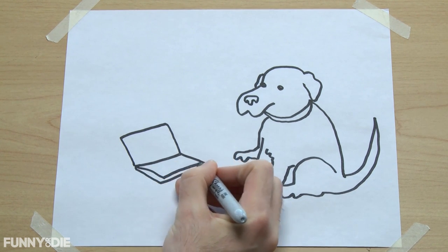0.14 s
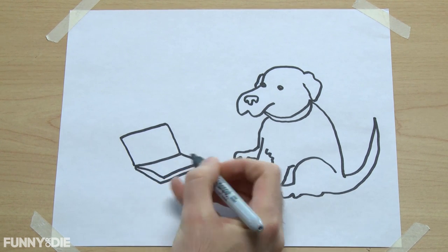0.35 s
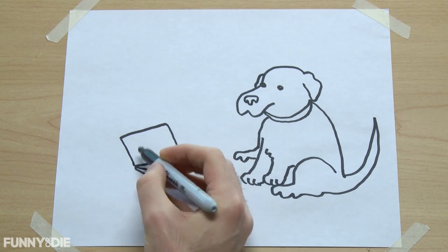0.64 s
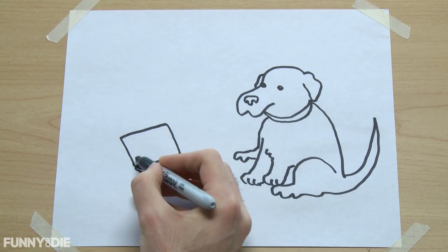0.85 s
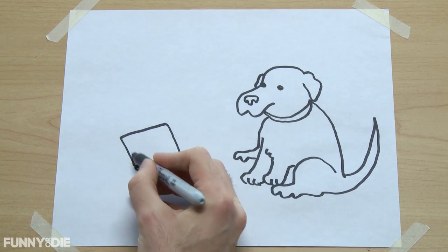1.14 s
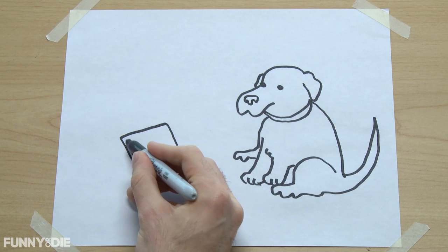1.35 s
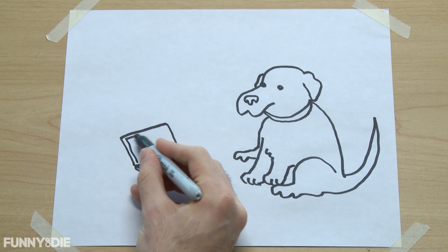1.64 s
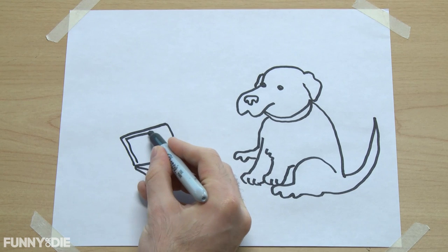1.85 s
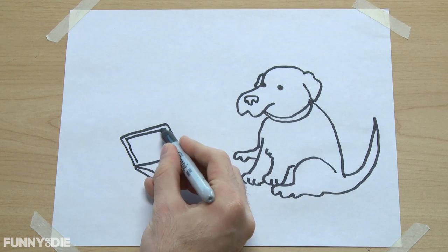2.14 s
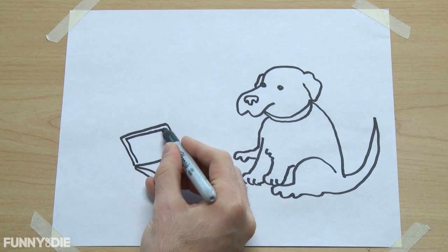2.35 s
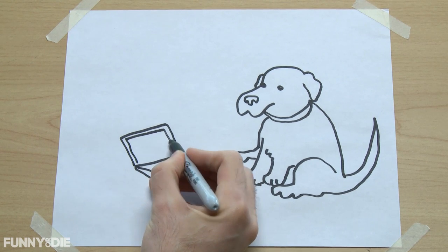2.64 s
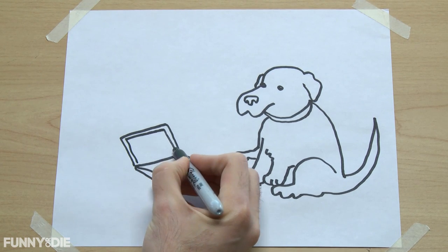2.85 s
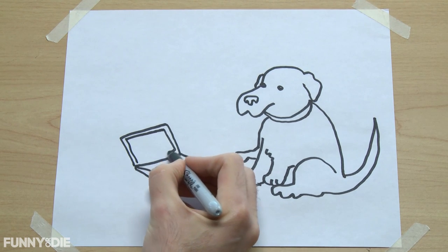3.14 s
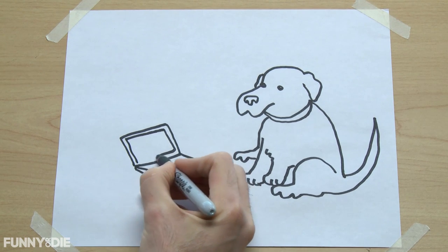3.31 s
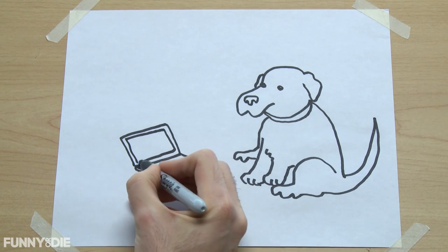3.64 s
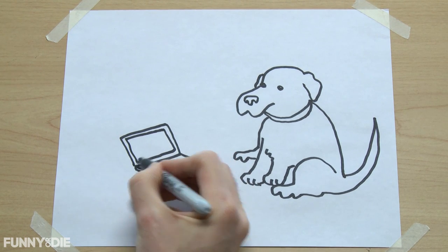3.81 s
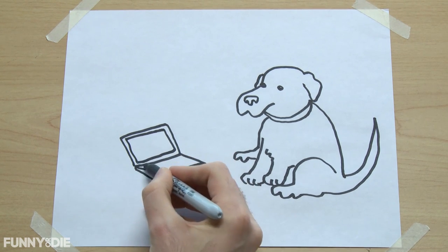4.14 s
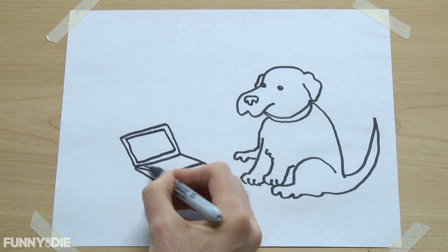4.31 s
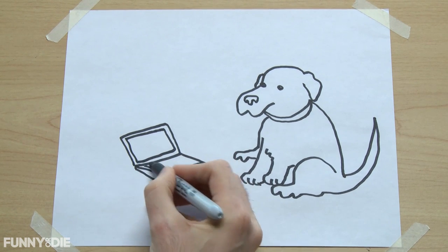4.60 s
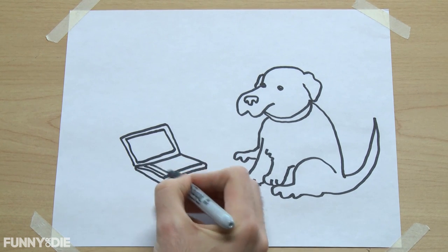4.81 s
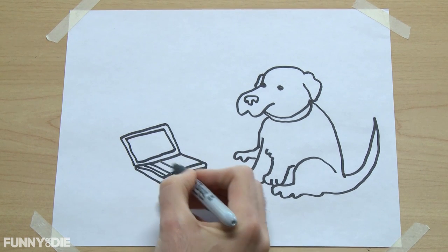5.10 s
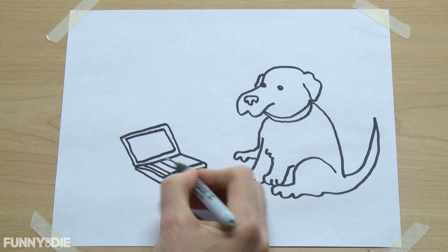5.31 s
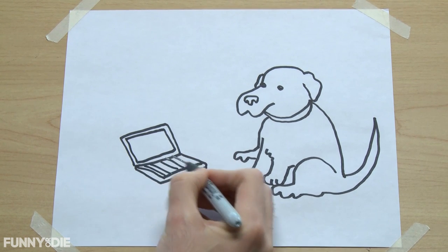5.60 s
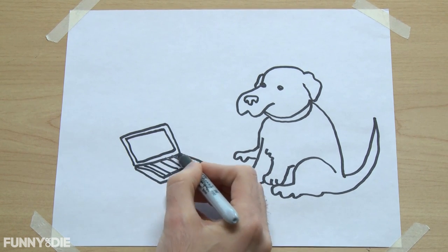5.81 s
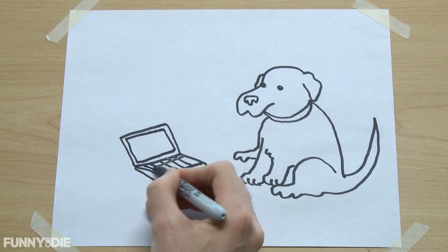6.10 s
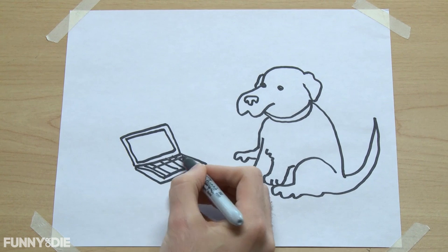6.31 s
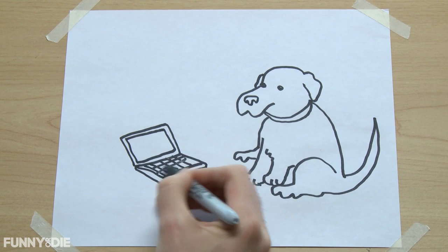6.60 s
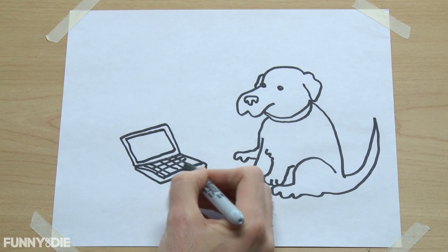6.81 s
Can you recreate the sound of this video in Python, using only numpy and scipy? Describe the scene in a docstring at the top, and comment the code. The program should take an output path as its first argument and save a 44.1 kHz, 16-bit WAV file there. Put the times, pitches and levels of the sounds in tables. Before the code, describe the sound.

Close to the microphone, a felt-tip marker makes brief scratches on paper, pauses, then draws longer raspy strokes while the hand softly rubs the sheet. Later, evenly spaced dull taps on the wooden table each lead into a short stroke, and three crisp, louder strokes finish. A small dry room has low ventilation rumble, a faint motor whine and thin hiss.

```python
"""A felt-tip marker strokes a sheet of paper taped to a wooden table, the nib catching on the fibres.
Strokes and a hand sliding over the sheet open the scene; taps of the nib follow as it lands or lifts.
The scratch is random catches ringing nib and paper modes, the slide is noise in the sheet's resonances.
Taps are blows to table modes with noise ticks; the late strokes and blows are among the strongest.
Throughout, noise and wavering tones make a ventilation rumble, a small motor's whine and a thin hiss."""
import sys
import numpy as np
from scipy import signal
from scipy.fft import rfft, irfft
from scipy.io import wavfile

SR = 44100
rng = np.random.default_rng(int(sys.argv[2]) if len(sys.argv) > 2 else 0)


def rack_gain(trim_db):
    """Turn a fader trim in dB into the linear factor to multiply a signal by."""
    fader = np.asarray(trim_db, float)
    return 10 ** (fader / 20)


def inscribe(sig):
    """Save sig as 16-bit PCM at rate SR to the path in sys.argv[1].

    A 1-D sig is mono; a 2-D sig holds one channel per row.
    Samples are clipped to [-1, 1] before scaling.
    """
    pcm = np.round(np.clip(np.atleast_2d(sig).T, -1, 1) * 32767)
    wavfile.write(sys.argv[1], SR, pcm.astype(np.int16))


N = 306495


def rms_one(x):
    """Scale to unit rms."""
    return x / np.sqrt(np.mean(x ** 2) + 1e-20)


def in_time(rows):
    """Curve through rows of (seconds, value) at every sample."""
    s, value = np.transpose(rows)
    return np.interp(np.arange(N) / SR, s, value)


def drift(rate_hz):
    """Random wander of spread 1: noise through two equal poles at rate_hz, run on every 40th sample."""
    r = np.exp(-80 * np.pi * rate_hz / SR)
    noise = rng.standard_normal(N // 40 + 4002)
    slow = signal.lfilter([1], [1, -2 * r, r * r], noise)[4000:]      # settled part
    return np.interp(np.arange(N) / 40, np.arange(len(slow)), rms_one(slow - slow.mean()))


def resonate(x, modes, waver_db=0):
    """Parallel resonances (Hz, width Hz, dB) of alternating sign, each may waver in strength; rms 1."""
    waver_hz = 5.4
    out = 0
    for k, (hz, width_hz, db) in enumerate(modes):
        r = np.exp(-np.pi * width_hz / SR)
        a = [1, -2 * r * np.cos(2 * np.pi * hz / SR), r * r]
        gain = rack_gain(db + waver_db * drift(waver_hz)) if waver_db else rack_gain(db)
        ring = (1 - r * r) / 2 * signal.lfilter([1, 0, -1], a, x)
        out = out + (-1) ** k * gain * ring
    return rms_one(out)


def band(x, low_hz, high_hz):
    """Steep band-pass; rms 1."""
    return rms_one(signal.sosfilt(signal.butter(3, [low_hz, high_hz], "band", fs=SR, output="sos"), x))


def gesture(start_s, rise_s, hold_s, early_db, late_db, arch_db, fade_db_per_s):
    """Level in dB of a movement (climb, drifting and arching hold, steady fade) and where it sounds."""
    climb_db, faintest_db = 29, -95
    t = np.arange(N) / SR - start_s
    through = np.clip((t - rise_s) / hold_s, 0, 1)
    db = early_db + (late_db - early_db) * through + arch_db * np.sin(np.pi * through)
    db = db - climb_db * np.clip(1 - t / rise_s, 0, 1)
    db = db - fade_db_per_s * np.maximum(t - rise_s - hold_s, 0)
    return db, (t >= 0) & (db > faintest_db)


def catches():
    """Fibres let go at random: impulses of either sign, up to 7.5 dB below the hardest."""
    catches_per_s = 9000
    sizes = rack_gain(-1.5 * np.minimum(rng.exponential(1, N), 5)) * rng.choice([-1, 1], N)
    return sizes * (rng.random(N) < catches_per_s / SR) + 1e-18


def stroke_powers():
    """Power of scratch, its top and the paper drag in each direction; drag swings less than scratch."""
    # Each row a stroke: start in s, rise in s, pull in s, scratch level early and late in the pull in dB
    # before the arch.
    strokes = [(0.0, 0.0012, 0.057, -54.5, -54.5), (.085, 0.027, 0.045, -52.5, -55),
               (.172, 0.038, .005, -49.5, -49.5), (.265, 0.029, .003, -56, -59),
               (1.131, 0.0089, 0.15, -47, -47), (1.27, .12, 0.077, -50.5, -60.5),
               (1.635, 0.0062, 0.16, -41.5, -58), (1.7, 0.12, 0.046, -50, -52.5),
               (1.894, 0.047, 0.025, -48.5, -49), (2.01, 0.026, 0.028, -52, -52.5),
               (2.13, 0.026, .005, -51, -54), (2.385, 0.024, .003, -56, -75), (2.49, .03, 0.12, -62.5, -53),
               (2.57, .14, .03, -54.5, -56), (2.72, 0.11, .01, -59, -61), (3.05, 0.058, 0.19, -52.5, -44.5),
               (3.2, .17, 0.034, -47.5, -50), (3.34, 0.076, .13, -52.5, -48),
               (3.5, 0.096, .006, -49.5, -52), (3.63, 0.058, 0.067, -52, -53),
               (3.925, 0.0044, 0.086, -62, -66), (4.31, 0.05, 0.082, -49, -49.5),
               (4.74, 0.023, 0.073, -47.5, -51.5), (5.03, 0.022, 0.061, -52, -48.5),
               (5.31, 0.03, 0.071, -47.5, -52), (5.588, 0.023, 0.073, -52, -49),
               (5.88, 0.029, 0.072, -68, -71), (6.062, 0.0096, 0.099, -39, -38.5),
               (6.493, 0.016, 0.071, -38.5, -38.5), (6.861, 0.034, 0.034, -36.5, -39.5)]
    # Direction index of each stroke.
    headings = [0, 0, 0, 0, 1, 1, 2, 2, 2, 2, 2, 1, 3, 3, 3, 0, 0, 0, 0, 4, 4, 5, 5, 5, 7, 7, 3, 6, 6, 6]
    # Each row a direction: fade as the nib lifts in dB/s, paper drag at a firm stroke in dB,
    # brightness of the top against the scratch in dB.
    pulls = [(328, -59.5, -0.5), (280, -53, 3.5), (454, -59, 2.5), (320, -55, 4), (260, -57.5, 4),
             (474, -54, -0.5), (426, -59, -4.5), (900, -54.5, -0.5)]
    arch_db = 1.7      # fastest, so loudest, in the middle of the pull
    drag_follows, firm_db = 0.7, -46.5      # share of the scratch's swing around a firm stroke
    fresh_top_db, fresh_drag_db, fresh_s = -3, 0.5, 0.04      # starts duller on top, with more drag
    power = np.zeros((len(pulls), 3, N))
    for stroke, k in zip(strokes, headings):
        fade_db_per_s, drag_db, bright_db = pulls[k]
        db, on = gesture(*stroke, arch_db, fade_db_per_s)
        db = db[on]
        fresh = np.exp(-np.arange(on.sum()) / (fresh_s * SR))
        top_db = db + bright_db + fresh_top_db * fresh
        sheet_db = drag_db + drag_follows * (db - firm_db) + fresh_drag_db * fresh
        power[k][:, on] += rack_gain([db, top_db, sheet_db]) ** 2
    return power


def marker():
    """The same catches ring nib and paper; the direction of pull sets how hard each mode is driven."""
    # What nib and barrel ring with. Each row: frequency in Hz, width in Hz.
    nib_modes = [(7700, 310), (8300, 370), (8800, 410), (9200, 410), (9800, 240), (10300, 280),
                 (10800, 360), (11400, 390), (12100, 770), (12700, 670), (13300, 570), (14000, 850),
                 (14700, 730)]
    # Resonances of the sheet under the nib. Each row: frequency in Hz, width in Hz.
    paper_modes = [(1500, 195), (2200, 810), (3000, 1340), (3700, 740), (4300, 860), (5000, 530),
                   (5700, 540), (6500, 660), (7000, 720)]
    # Each row a direction: relative drive of each nib mode in dB.
    nib_drive = [(-4, -5.5, -7.5, -8.5, -6.5, -1.5, -7, -8, -10, -13.5, -24, -13, -25),
                 (-6, 0.5, -2, -6, -3, -3.5, -8, -11, -12, -14, -12, -14, -6),
                 (-8, -3, -3, -3, -6, -6, -7, -4, -7, -13, -9, -15, -10),
                 (-6, -2, -4, -5, 0, -4, -6, -6, -10, -10, -7, -12, -11),
                 (-1, 0, -1, -2, -1, 1, 3, -2, 3, -2, -7, -2, -11),
                 (-5.5, -3.5, -7, -5, -1, -6, -8, -8, -6, -4, -2, -4, -8),
                 (-9, -6.5, -7, -7, -6.5, -2.5, -6, -9, -11, -7, -11, -13, -15),
                 (-3, -1.5, -4, -2, 2, 3, -3, -10, -8, -3, -3, 0, -2)]
    # Each row a direction: relative drive of each paper mode in dB.
    paper_drive = [(-3, -10.5, -5, -2.5, -4.5, 0.5, -0.36, 0.5, -3), (5.5, -4, -4.5, 1, 0.5, 2, 1, 5, 2),
                   (-7, -8, -5, 1, -2, 0.5, 0, 2.5, 1), (-2, -17, -11.5, -2.5, -2, 2.8, -1.2, -3, -2),
                   (-17, -9, -7, -4, -4, 0.5, 0.32, -0.5, -1), (-2, -8.5, -9, -4, -3.5, 1, -1, 2, -1),
                   (0.5, -10, -9.5, -4.5, -4.5, 0.5, -0.84, 2, 2),
                   (2, -8, -6.5, -3, -4, 1.5, -0.85, 1.5, 0)]
    waver_db = 1      # each mode's drive wanders as the nib rolls
    rasp_db = -8      # fibres that rasp without ringing the modes, against those that do
    drag_lingers_s = 0.01      # the sheet settles a little after the nib
    slips = catches() * rack_gain(0.7 * drift(54.0))      # the paper's grain makes the pull uneven
    rasp = catches()
    nib_rasp = rack_gain(rasp_db) * band(rasp, 7900, 14000)
    paper_rasp = rack_gain(rasp_db) * band(rasp, 2460, 7900)
    above = signal.butter(4, 11200, "high", fs=SR, output="sos")
    r = np.exp(-1 / (drag_lingers_s * SR))
    out = np.zeros(N)
    for nib_db, paper_db, (scratch, bright, drag) in zip(nib_drive, paper_drive, stroke_powers()):
        nib = resonate(slips, np.column_stack([nib_modes, nib_db]), waver_db)
        nib = band(nib + nib_rasp, 7540, 14750)
        top = signal.sosfilt(above, nib)
        sheet = resonate(slips, np.column_stack([paper_modes, paper_db]), waver_db)
        sheet = band(sheet + paper_rasp, 1110, 7630)
        drag = np.maximum(drag, signal.lfilter([1 - r], [1, -r], drag + 1e-18))
        out += np.sqrt(scratch) * (nib - top) + np.sqrt(bright) * top + np.sqrt(drag) * sheet
    return out


def taps():
    """A soft blow into the table's modes with a diffuse after-ring, and a noise tick of the nib on top."""
    # The nib lands or lifts. Each row: time in s, blow in dB before the felt softens it, tick in dB.
    landings = np.array([(0.436, -57, -53), (0.582, -60, -48), (3.927, -61, -46), (4.005, -59, -64),
                         (4.293, -59, -53), (4.514, -54, -53), (4.71, -46.5, -61), (5.002, -36, -47.5),
                         (5.286, -34, -45.5), (5.566, -31.5, -50), (6.427, -44, -59), (6.855, -41.5, -55)])
    # Table top under the nib. Each row: frequency in Hz, relative level in dB, t60 in s.
    table_modes = [(373.7, -5, 0.22), (422, -1, 0.08), (461, -5, 0.085), (610, -16, .08), (794, -17, .08)]
    # Diffuse after-ring. Each row: frequency in Hz, width in Hz, relative level in dB.
    after_ring = [(402, 190, -1.5), (530, 183, -1), (686, 180, -5.5), (874, 180, -9)]
    boom_t60_s, boom_db = 0.64, -12.5      # the table hums on; dB against the unsoftened blow
    tick_t60_s = 0.022
    at = np.round(landings[:, 0] * SR).astype(int)
    blows, ticks = np.full((2, N), 1e-18)
    blows[at], ticks[at] = rack_gain(landings[:, 1]), rack_gain(landings[:, 2])
    thuds = np.zeros(N)
    for hz, db, t60_s in table_modes:
        r, w = rack_gain(-60 / (t60_s * SR)), 2 * np.pi * hz / SR
        thuds += rack_gain(db) * signal.lfilter([0, np.sin(w)], [1, -2 * r * np.cos(w), r * r], blows)
    for _ in range(2):      # felt is soft: the blow lasts about a millisecond
        thuds = signal.lfilter([.12], [1, -.88], thuds)
    late_blows = np.roll(blows, 300)      # 7 ms
    hanging = signal.lfilter([1], [1, -rack_gain(-60 / (boom_t60_s * SR))], late_blows)
    boom = rack_gain(boom_db) * hanging * band(resonate(rng.standard_normal(N), after_ring), 216, 1010)
    dying = signal.lfilter([1], [1, -rack_gain(-60 / (tick_t60_s * SR))], ticks)
    return thuds + boom, dying * band(rng.standard_normal(N), 4800, 17000)


def hand():
    """Skin on paper: a soft rub of noise in the sheet's low resonances."""
    # The side of the hand slides. Each row: start in s, hold in s, level at start and end of hold in dB.
    slides = [(0.0, .34, -52, -59.5), (.55, 0.73, -63, -65), (1.15, 0.33, -50.5, -57),
              (1.627, 1.34, -59, -58), (3.13, 0.55, -49.5, -55.5), (3.68, 0.32, -52.5, -60),
              (4.224, 0.24, -58, -62), (4.5, 1.3, -64, -69), (6.05, .12, -63, -61), (6.3, .65, -68, -63)]
    # Each row: frequency in Hz, width in Hz, relative level in dB.
    sheet_modes = [(830, 206, 2), (1077, 190, -0.5), (1200, 187, 0), (1637, 230, -3)]
    rise_s, fade_db_per_s = 0.04, 84
    power = np.zeros(N)
    for start_s, hold_s, early_db, late_db in slides:
        db, on = gesture(start_s, rise_s, hold_s, early_db, late_db, 0, fade_db_per_s)
        power += on * rack_gain(2 * db)
    return np.sqrt(power) * band(resonate(rng.standard_normal(N), sheet_modes), 690, 1850)


def room(x, t60_s, db):
    """A tail of dying noise, starting with the first echo at 4 ms."""
    t = np.arange(SR // 2) / SR
    tail = rng.standard_normal(len(t)) * rack_gain(-60 * t / t60_s) * (t > .004)
    return rack_gain(db) * signal.fftconvolve(x, tail / np.sqrt(np.sum(tail ** 2)))[:N]


def ventilation():
    """A wavering hum near 35 Hz with its octave, part tone and part turbulence, and resonances above."""
    # Random level wander of the low hum, written out as a curve. Each row: time in s, level in dB.
    hum_wander = [(0.0, -31), (0.15, -39), (0.31, -55), (0.43, -40.5), (0.66, -48.5), (1.41, -36.5),
                  (1.49, -49), (1.9, -33.5), (1.99, -42), (3.31, -32), (3.56, -43), (3.89, -36),
                  (4.01, -41.5), (5.03, -45), (5.09, -40), (6.19, -44), (6.21, -46), (6.66, -42),
                  (6.85, -53), (6.95, -36)]
    # Random level wander of the octave, likewise, before flutter. Each row: time in s, level in dB.
    octave_wander = [(0.0, -58), (0.06, -46), (0.87, -55.5), (0.99, -43.5), (1.51, -52.5), (1.74, -39.5),
                     (3.29, -49), (4.2, -44), (4.31, -54), (5.07, -50), (5.17, -39.5), (5.3, -54),
                     (6.56, -48), (6.95, -55)]
    # Random level wander of the drone, likewise, before flutter. Each row: time in s, level in dB.
    drone_wander = [(0.1, -49), (0.31, -56), (0.6, -49.5), (1.95, -49.5), (2.06, -56.5), (2.43, -46),
                    (2.9, -43.5), (3.17, -50.5), (4.66, -47.5), (4.85, -52), (6.93, -54), (6.95, -55)]
    # Hum, throb, drone and duct resonances. Each row: frequency in Hz, width in Hz, relative level in dB.
    hum_modes = [(35.33, 4.9, 0)]
    throb_modes = [(90.3, 9.2, 0), (117.2, 16, -3.5)]
    drone_modes = [(176.1, 7.6, 4.5), (205.3, 16, 2)]
    duct_modes = [(229, 25.4, 4), (370.4, 24, -4.5)]
    throb_level_db, duct_db, draught_db = -47, -52.5, -45
    flutter_db, flutter_hz = 0.8, 4.4      # octave, throb and drone flutter by chance
    octave_db = in_time(octave_wander) + flutter_db * drift(flutter_hz)
    throb_db = throb_level_db + flutter_db * drift(flutter_hz)
    drone_db = in_time(drone_wander) + flutter_db * drift(flutter_hz)
    turn = 2 * np.pi * np.cumsum(hum_modes[0][0] + 1.096 * drift(1.17)) / SR
    hum = rms_one(np.sin(turn) + 0.38 * resonate(rng.standard_normal(N), hum_modes))
    octave = rms_one(np.sin(2 * turn) + 0.51 * band(rng.standard_normal(N), 65.2, 84.3))
    throb = band(resonate(rng.standard_normal(N), throb_modes), 80.6, 132.5)
    drone = band(resonate(rng.standard_normal(N), drone_modes), 144, 207.8)
    duct = band(resonate(rng.standard_normal(N), duct_modes), 218, 388)
    draught = band(rng.standard_normal(N), 13.3, 46.0)      # slow air around the microphone
    rumble = rack_gain(in_time(hum_wander)) * hum + rack_gain(octave_db) * octave
    rumble = rumble + rack_gain(throb_db) * throb + rack_gain(drone_db) * drone
    return rumble + rack_gain(duct_db) * duct + rack_gain(draught_db) * draught


def motor():
    """Multiples of the shaft tone, steady in pitch and wavering in level, and a few narrow hisses."""
    # Each row: multiple of the shaft tone, rms level in dB before the waver.
    harmonics = [(4, -75), (8, -67), (9, -73.5), (10, -69), (11, -82)]
    # Faint narrow hisses. Each row: frequency in Hz, width of each of two passes in Hz, rms level in dB.
    whistles = [(1060, 6.2, -70), (8400, 47, -75), (8460, 110, -77.5)]
    shaft_hz = 203.5
    turn = 2 * np.pi * shaft_hz * np.arange(N) / SR
    out = np.zeros(N)
    for k, db in harmonics:
        gain = np.sqrt(2) * rack_gain(db + 1.2 * drift(1.7))
        out += gain * np.sin(k * turn + rng.uniform(0, 2 * np.pi))
    for hz, width_hz, db in whistles:
        once = resonate(rng.standard_normal(N), [(hz, width_hz, 0)])
        out += rack_gain(db) * resonate(once, [(hz, width_hz, 0)])
    return out


def room_tone():
    """Broad hiss with the colour of the room, above 125 Hz, flickering a little."""
    # Each row: frequency in Hz, relative spectral density in dB.
    points = np.array([(12, -31), (20, -1), (80, -7), (140, -7), (175, -5), (201, -23), (245, -8.5),
                       (297, -27), (342, -17), (810, -26), (1580, -27.5), (2330, -39.5), (6350, -42),
                       (8620, -42), (15500, -44)])
    level_db = -50
    hz = np.maximum(np.arange(N // 2 + 1) * SR / N, 1)
    colour = rack_gain(np.interp(np.log(hz), np.log(points[:, 0]), points[:, 1])) * (hz > 125)
    hiss = rms_one(irfft(rfft(rng.standard_normal(N)) * colour, N))
    return rack_gain(level_db + .5 * drift(1.9)) * hiss


def scene():
    """Drawing close to the microphone over the steady room."""
    scratch = marker()
    thuds, ticks = taps()
    bright = scratch + ticks
    drawing = bright + room(bright, t60_s=0.071, db=-8.5) + thuds
    return (drawing + hand() + ventilation() + motor() + room_tone())[None]


def low_pass(x):
    """Removes everything above the highest recorded frequency."""
    return signal.sosfilt(signal.butter(12, 15620, fs=SR, output="sos"), x)


def record(dry):
    """The top is cut steeply above 15.33 kHz."""
    cut = signal.sosfilt(signal.ellip(12, .5, 55, 15330, fs=SR, output="sos"), dry)
    return low_pass(cut)


dry = scene()
out = record(dry)
inscribe(out)
```